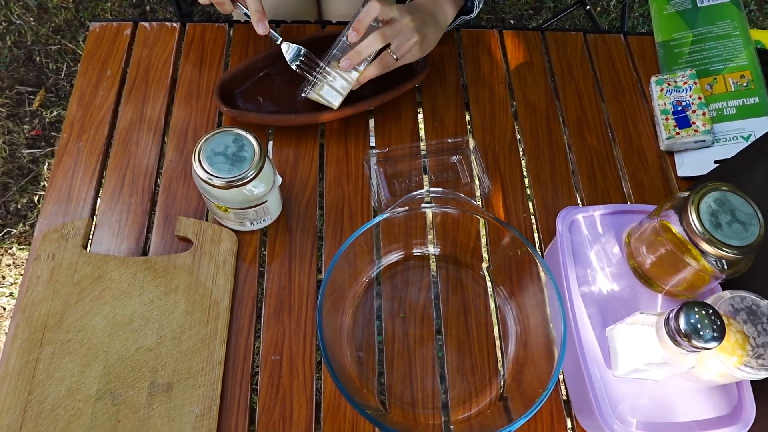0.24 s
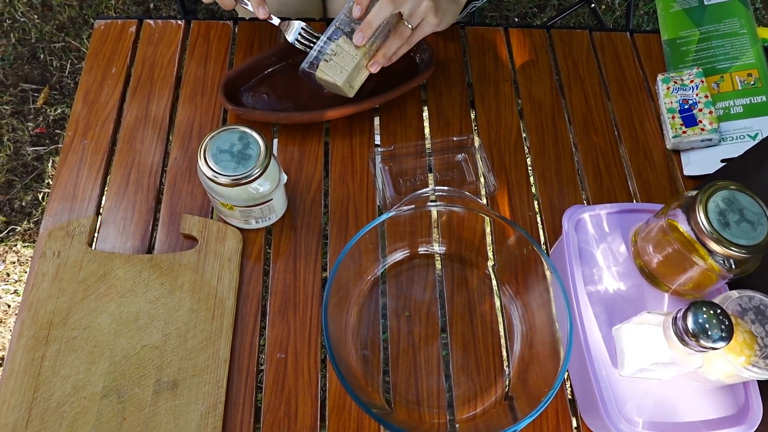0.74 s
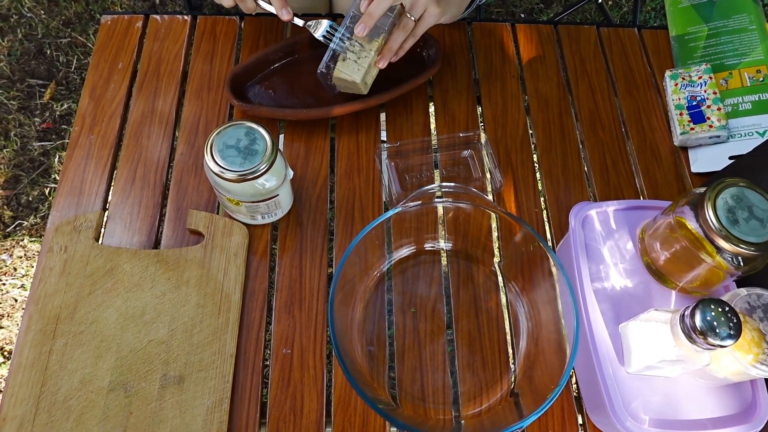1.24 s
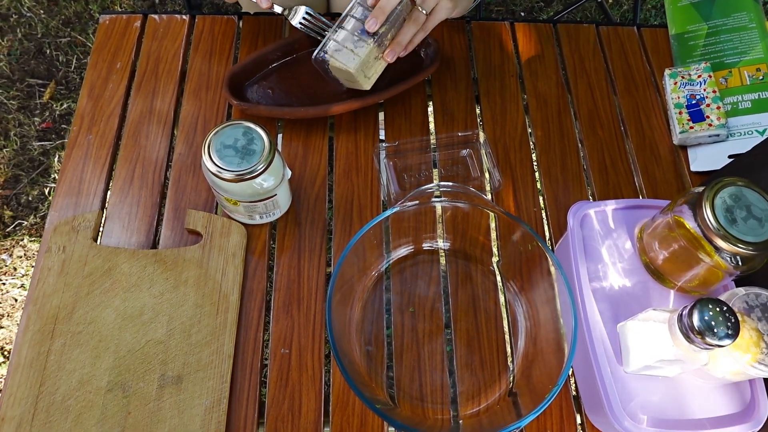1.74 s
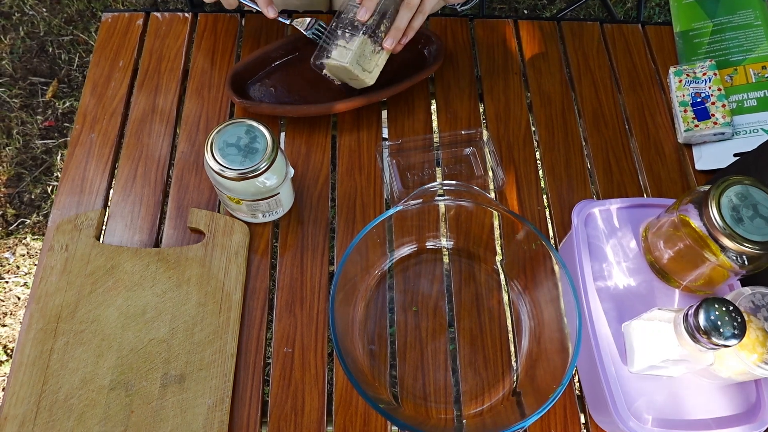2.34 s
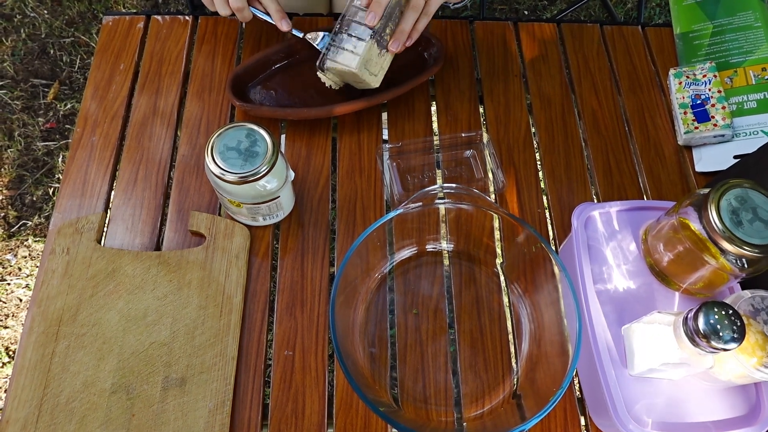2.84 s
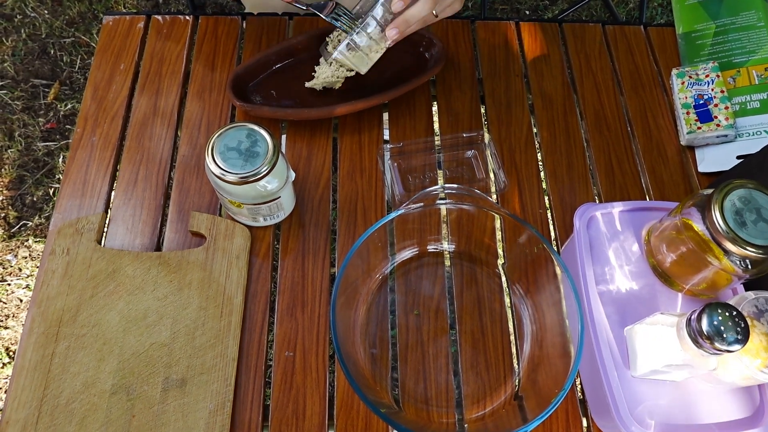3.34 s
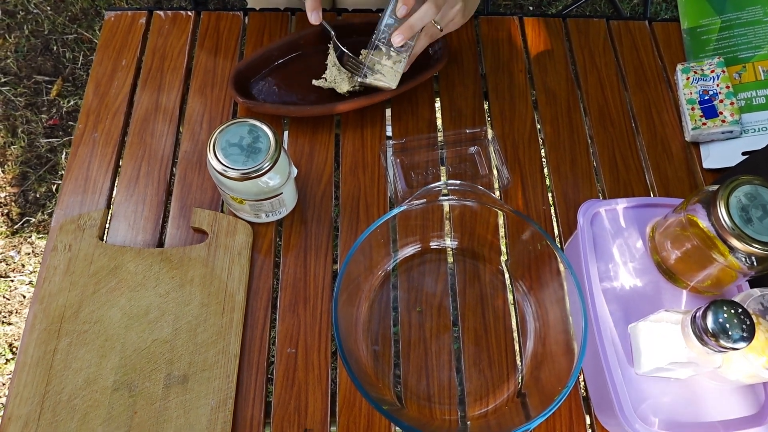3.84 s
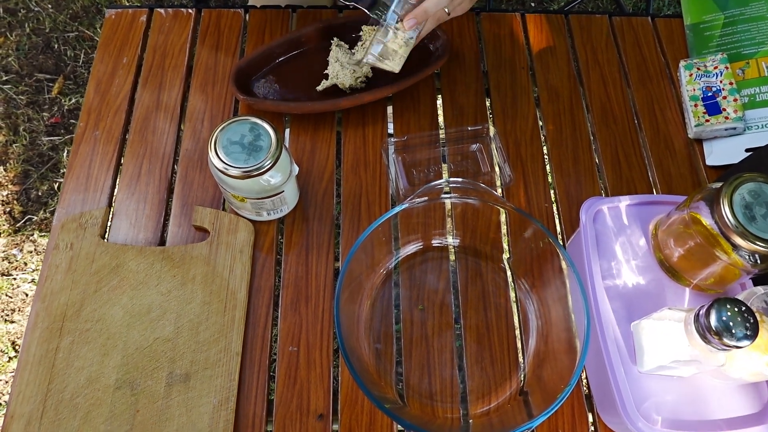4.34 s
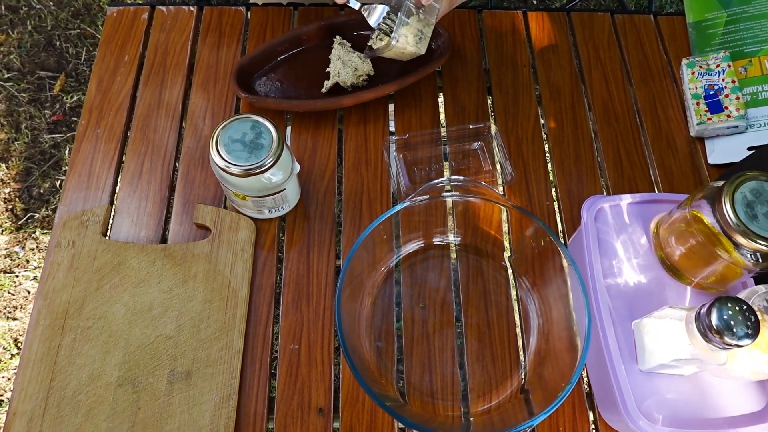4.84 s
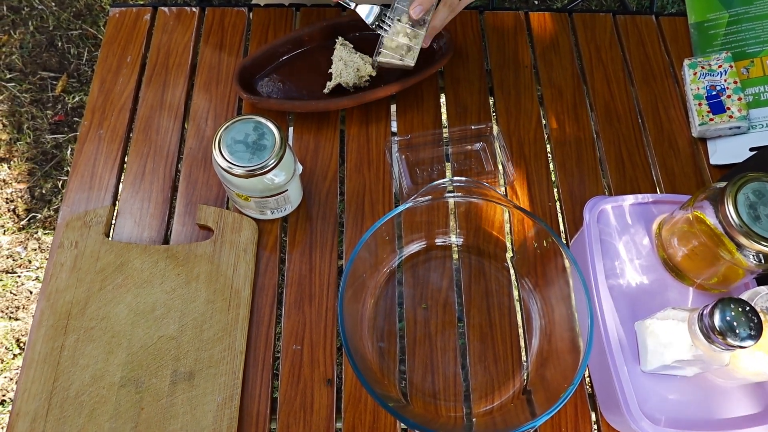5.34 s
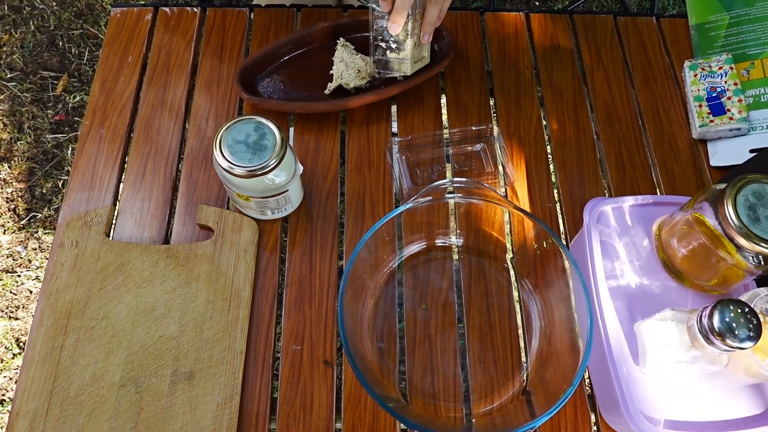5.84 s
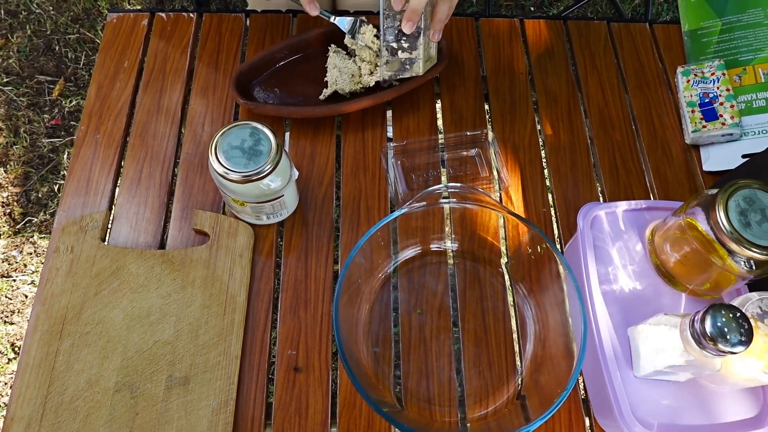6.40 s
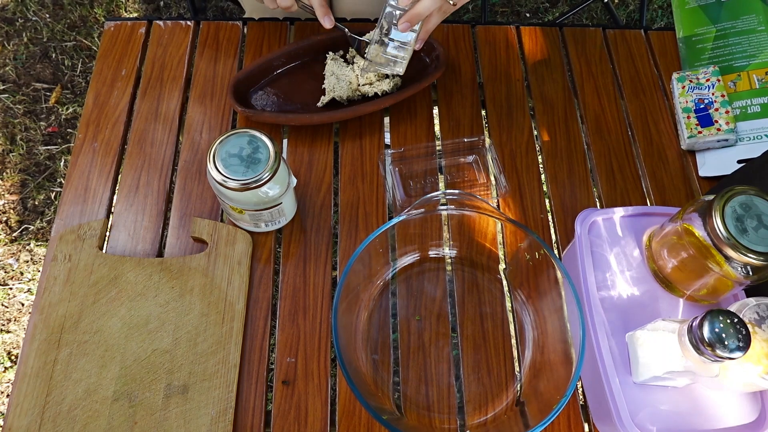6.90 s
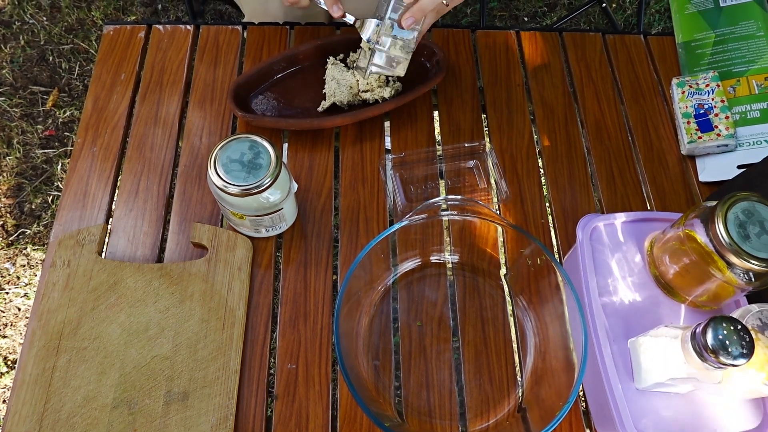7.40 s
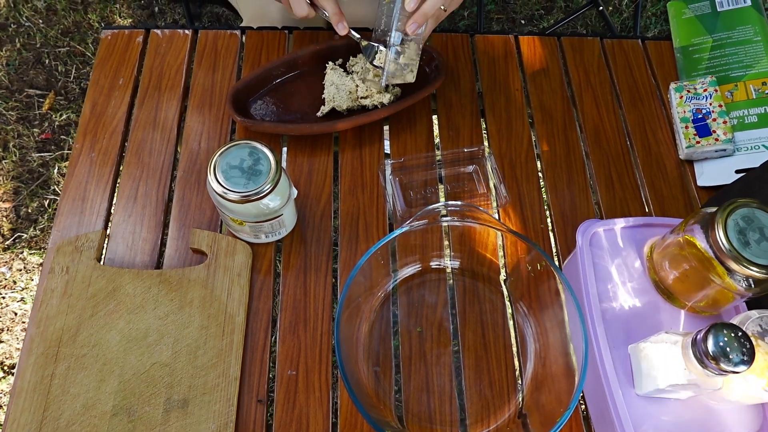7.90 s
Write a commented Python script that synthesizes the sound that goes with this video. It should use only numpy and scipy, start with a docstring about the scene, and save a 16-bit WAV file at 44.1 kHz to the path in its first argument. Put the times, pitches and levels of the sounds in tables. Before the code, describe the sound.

Dry plastic pops, light fork taps and small smearing rubs at a camp table, one harsh rasp, and low rumble slowly growing behind.

```python
"""A fork digs soft food out of a small thin plastic tub over a dish on an outdoor camp table.
The tub rings in short damped modes as its wall snaps in and out; between snaps, grains of slip rub and smear.
Once the tines skid with a harsh rasp; the fork clinks on the dish and dull bumps shake the table.
The tub sits in the centre with faint reflections. All round lie a nearly even hiss and a low rumble that
grows from midway, with light gusts on the microphone; a faint far whine is heard only at the start."""
import sys
import numpy as np
from scipy import signal
from scipy.fft import rfft, irfft, next_fast_len
from scipy.io import wavfile

SR = 44100
rng = np.random.default_rng(int(sys.argv[2]) if len(sys.argv) > 2 else 0)


def transcribe(signal):
    """Save signal, clipped to [-1, 1], as a 16-bit WAV file at the path in sys.argv[1]."""
    frames = np.atleast_2d(signal).T
    limited = np.clip(frames, -1, 1)
    pcm = np.round(limited * 32767).astype(np.int16)
    wavfile.write(sys.argv[1], SR, pcm)


N = 359856
TIME = np.arange(N) / SR

# Hiss of the open air. Each row: frequency in Hz, relative level in dB per Hz.
AIR_COLOUR = [(240, -31), (400, -9), (811, -6), (945, -6.5), (1090, -8), (1210, -5), (1860, -9),
              (2410, -7.5), (5530, -9), (15700, -23)]
# Level of the hiss over time. Each row: time in seconds, level in dB.
AIR_LEVEL = [(0, -51.5), (1.7, -53.5), (3.3, -54), (4.2, -52.5), (8.16, -50)]
# Low outdoor rumble. Each row: frequency in Hz, relative level in dB per Hz.
RUMBLE_COLOUR = [(25, -42), (50, -20), (85, -8), (150, -1.5), (280, -0.5), (400, -7), (600, -13.5),
                 (850, -35)]
# Steady at first, then growing.
RUMBLE_DB, RUMBLE_GROWS_FROM_S, RUMBLE_DB_PER_S = -61.5, 3.96, 1.4
# Gusts on the microphone. Each row: peak in seconds, level in dB, seconds to rise or fall by a factor e.
GUSTS = [(5.85, -70, 0.17), (8.17, -55.5, 0.085)]
# Buffeting at the microphone. Each row: frequency in Hz, relative level in dB per Hz.
BUFFET_COLOUR = [(15, -45), (30, -22), (60, 2), (110, -4), (200, -13), (400, -47)]
GUST_RUMBLE_DB = 12   # rumble that a gust stirs up, against its buffeting
# Stereo width of the background. Each row: frequency in Hz, left-right correlation from 0 to 1.
STEREO_LIKENESS = [(30, 0.54), (150, 0.77), (1000, 0.76), (6000, 0.74)]

# The far whine comes and goes. Each row: start in seconds, end in seconds, level in dB.
WHINES = [(-.04, 0.108, -56), (0.105, 0.404, -55.5), (0.497, .72, -61)]
WHINE_HZ, WHINE_FADE_S = 953, 0.03   # mean pitch of its strongest partial; fade at each end

# Rubbing strokes. Each row: start in seconds, end in seconds, level in dB, food under the tines from 0 to 1.
STROKES = [(0.135, 0.202, -61, 0.01), (0.334, 0.391, -49.5, 0.15), (1.235, 1.356, -61, 0.3),
           (1.29, 1.68, -65.5, 0.64), (2.134, 2.255, -60.5, 0), (2.244, 2.528, -62, 0.83),
           (2.76, 2.935, -60.5, 1), (3.537, 3.743, -63, 0.7), (3.776, 3.903, -58.5, 0.57),
           (4.057, 4.177, -57.5, 0.88), (4.562, 4.614, -53, 0.65), (4.782, 4.83, -55, 1),
           (5.486, 5.707, -63.5, 0.5), (5.787, 5.868, -51.5, 0.56), (6.22, 6.322, -53, 0.78),
           (6.9, 6.964, -50.5, 0.5), (7.098, 7.18, -54, 0.44), (7.393, 7.427, -52.5, 0.33),
           (7.508, 7.548, -59, 0.06), (7.636, 7.663, -49.5, 0.4), (7.705, 7.814, -56, 0.6),
           (7.902, 8.03, -54.5, 0.58), (8.077, 8.148, -58, 0.4)]
# Colour of the tub body under a stroke. Each row: frequency in Hz, relative level in dB per Hz.
BODY_COLOUR = [(25, -45), (150, -22), (450, -10), (900, -5.5), (1500, -1), (2300, -3.5), (3200, -0.5),
               (6000, -53)]
# Colour of dry friction. Each row: frequency in Hz, relative level in dB per Hz.
FRICTION_COLOUR = [(1200, -6.5), (2200, -1), (3300, 2.5), (4600, 1.5), (6800, -10), (9000, -24),
                   (16000, -47)]
# Colour of wet smear. Each row: frequency in Hz, relative level in dB per Hz.
SMEAR_COLOUR = [(4000, -32), (6500, 3), (8000, -0.5), (11000, -1.5), (16000, -8.5)]
# Balance of body, friction and smear in dB: on bare plastic, and deep in the food.
BARE_DB, COATED_DB = (9, 2.5, -8.5), (-5.5, 3.5, 4.5)
# Fork and tub under sliding tines. Each row: mode in Hz, relative level in dB, 60 dB decay in seconds.
SLIDING_MODES = [(853, 1, 0.03), (1200, 3, 0.035), (2140, 5.5, 0.03), (2520, -2, 0.017), (3680, -9, .012),
                 (5530, -19, .02), (7300, -16, .016), (8050, -17, 0.015)]

# The tub, one list each for wall, bottom, rim, crack and tick.
# Each row: mode in Hz, level within its list in dB, 60 dB decay in seconds.
TUB_MODES = [
    [(1259, -9, 0.02), (1420, -0.5, .011), (1564, 2.5, 0.01)],
    [(872, -3.5, 0.024), (1095, 17, 0.0092)],
    [(1810, 12, 0.0073), (2105, 13, 0.0058), (2570, -6.5, 0.026)],
    [(3430, 3.5, 0.014), (4120, 9.5, 0.0057), (4520, 6, 0.0055), (5795, 0.5, 0.0093), (6970, -6, 0.0071)],
    [(7800, 8.5, 0.0034), (9930, 0.5, 0.0084), (10750, 2, 0.0056), (14000, 2, .004)],
]
# Snaps as the wall is pushed in, and faint, hollow dull pats on the tub. Each row: time in seconds,
# wall level in dB rms over 10 ms, brightness in dB, hollow ring of the bottom in dB against the wall.
SNAPS_AND_PATS = [(0.3076, -24, -11, -11), (0.963, -24, -3.5, -10), (1.0267, -41.5, 2.5, 4),
                  (1.185, -55, -6, 11.5), (1.243, -36, -2.5, 0.5), (2.0913, -51, -5, 4),
                  (2.8583, -46, -9, 4.5), (2.959, -50.5, -6, 12), (3.7741, -25.5, 1, -12),
                  (4.0237, -24, 1.5, -12), (4.4009, -22.5, -13, -6.5), (4.4077, -30.5, -12, -5),
                  (4.5621, -25, -1, -7.5), (4.8173, -23, -7.5, -5.5), (4.9475, -40.5, -20, -5.5),
                  (6.869, -35.5, -18, 5), (6.8954, -30.5, -15, -4), (6.9088, -23.5, -12, -1.5),
                  (7.2649, -38, -22, -3), (7.301, -24, -16.5, -6), (7.4895, -20.5, -14, -6),
                  (7.6954, -18, -12, -9.5)]
# The wall springs back as the fork eases off. Each row: time in seconds, wall level in dB rms over 10 ms,
# brightness in dB.
REBOUNDS = [(4.4452, -20, -22), (4.864, -23, -12.5), (7.0452, -21, -20), (7.3495, -21, -19),
            (7.6046, -21, -10.5), (7.8291, -22.5, -12), (8.0554, -25.5, -14.5)]
# The tines tap the tub without a snap. Each row: time in seconds, wall level in dB rms over 10 ms,
# brightness in dB.
TAPS = [(0.2425, -44.5, 5.5), (0.2923, -43, 1), (1.2656, -48.5, 11.5), (1.871, -48.5, 10.5),
        (2.0259, -52, -4), (2.1596, -42.5, -9), (2.206, -41, 0.5), (4.1256, -52, 8.5), (5.5496, -44, -3),
        (5.7825, -45, 13.5), (5.8303, -55, 15), (6.3223, -45, 9), (7.3741, -41, 1), (7.8175, -47, 8.5),
        (8.0137, -43.5, -15)]
REBOUND_HOLLOW_DB, TAP_HOLLOW_DB = -30, 0   # ring of the bottom: a rebound hardly stirs it, a tap does
REBOUND_RIM_DB = -3   # a rebound also spares the rim
# A harder contact feeds rim, crack and tick, in that order.
# Each row: level in dB against the wall, dB gained per dB of brightness.
HARDNESS = [(1, .5), (0.5, 1), (-15.5, 1.8)]
LOWEST_HZ = 772   # lower edge of the ring of tub and dish
THUD_DB, THUD_TOP_HZ = -30.5, 430   # dull thud against the ringing shell, and its upper edge

# Dull bumps on dish and table. Each row: time in seconds, level in dB, 60 dB decay in seconds, boom in Hz.
BUMPS = [(2.195, -45.5, 0.16, 203), (2.751, -37, 0.034, 405), (3.836, -43.5, 0.1, 249),
         (3.858, -43.5, 0.23, 159), (5.783, -35.5, 0.14, 325), (5.808, -40, 0.19, 304),
         (5.829, -43.5, 0.27, 166), (8.090, -38.5, 0.14, 263)]
# Rattle of the table. Each row: frequency in Hz, relative level in dB per Hz.
BUMP_COLOUR = [(20, -45), (50, -22), (120, 2.5), (500, 0), (900, 5), (1250, 0), (2500, -35)]

CLINK_S, CLINK_DB = 2.7524, -24.5   # one knock on the dish: time, dB rms over 10 ms before its high-pass
# The dish. Each row: mode in Hz, relative level in dB, 60 dB decay in seconds.
DISH_MODES = [(1210, -4, 0.017), (2600, -3, 0.018), (3160, -3.5, 0.01), (3880, 6.5, 0.0048),
              (5560, -8.5, 0.0078), (9700, -1, 0.0021)]

# The hard skid: the tines catch and let go while the pressure builds.
SKID_START_S, SKID_HOLD_S, SKID_ATTACK_S, SKID_T60_S = 6.339, 0.034, .0015, 0.021
SKID_DB, SKID_SWELL_DB_PER_S = -22, 124
JUDDER_S, JUDDER_SAG_DB = 0.012, 7   # time between catches, and the level lost within each
# Grit of the skid. Each row: frequency in Hz, relative level in dB per Hz.
SKID_GRIT = [(100, -55), (600, -33), (1000, -22), (3000, 6), (7000, 4), (16000, -2.5)]

CUTOFF_HZ = 16000


def from_db(db):
    """Decibels to gain."""
    return 10 ** (np.asarray(db) / 20)


def rms_one(x):
    """Scale to rms 1."""
    return x / np.sqrt(np.mean(x ** 2) + 1e-20)


def at_hz(points, hz):
    """Read a spectrum on a log-frequency axis."""
    f, value = np.transpose(points)
    return np.interp(np.log(hz + 1e-6), np.log(f), value)


def cut(x, hz, kind, order=2):
    """Butterworth low- or high-pass."""
    return signal.sosfilt(signal.butter(order, hz, kind, fs=SR, output="sos"), x)


def coloured(x, spectrum):
    """Give a noise or grain stream a spectrum; rms 1."""
    size = next_fast_len(N)
    hz = np.arange(size // 2 + 1) * SR / size
    gain = from_db(at_hz(spectrum, hz))
    return rms_one(irfft(rfft(x, size) * gain, size)[:N])


def drift(per_s):
    """Random wandering: straight lines between normal draws, per_s of them each second."""
    knots = rng.standard_normal(N // 20)
    return np.interp(TIME * per_s, np.arange(len(knots)), knots)


def grains(per_s, spread_db):
    """Tiny slips at random moments, of very uneven size; rms 1."""
    sizes = from_db(spread_db * np.minimum(rng.exponential(1, N), 4))
    signs = rng.choice([-1, 1], N)
    happens = rng.random(N) < per_s / SR
    return rms_one(sizes * signs * happens)


def ring(x, hz, t60):
    """One damped mode driven by x, as a two-pole resonator."""
    r = from_db(-60 / (t60 * SR))
    w = 2 * np.pi * hz / SR
    return signal.lfilter([0, np.sin(w)], [1, -2 * r * np.cos(w), r * r], x + 1e-18)


def add(track, s, sound):
    """Mix a sound into a track at s seconds."""
    i = round(s * SR)
    track[i:i + len(sound)] += sound[:N - i]


def wide_noise(spectrum):
    """Stereo noise, partly alike in both channels; rms 1."""
    size = next_fast_len(N)
    hz = np.arange(size // 2 + 1) * SR / size
    alike = at_hz(STEREO_LIKENESS, hz)
    mid, side = rfft(rng.standard_normal((2, size)))
    both = np.sqrt(1 + alike) * mid + np.sqrt(1 - alike) * side * [[1], [-1]]
    return rms_one(irfft(both * from_db(at_hz(spectrum, hz)), size)[:, :N])


def background():
    """Nearly even hiss, a growing outdoor rumble and light gusts on the microphone, all shaped noise."""
    air_s, air_db = np.transpose(AIR_LEVEL)
    air = from_db(np.interp(TIME, air_s, air_db)) * cut(wide_noise(AIR_COLOUR), 370, "high")
    gust = sum(from_db(db) * np.exp(-np.abs(TIME - s) / width_s) for s, db, width_s in GUSTS)
    steady = from_db(RUMBLE_DB + RUMBLE_DB_PER_S * np.maximum(TIME - RUMBLE_GROWS_FROM_S, 0))
    stirred = from_db(GUST_RUMBLE_DB) * gust
    rumble = np.hypot(steady, stirred) * wide_noise(RUMBLE_COLOUR)
    buffeting = gust * from_db(2 * drift(12)) * wide_noise(BUFFET_COLOUR)
    return air + rumble + buffeting


def whine(waver=0.0175, upper_db=-10.0, flutter_db=5.0, flutters_per_s=40):
    """Second and third partials of a far, unsteady tone that flutters on its way."""
    phase = 2 * np.pi * np.cumsum(WHINE_HZ * (1 + waver * drift(142.7))) / SR
    tone = np.sin(phase) + from_db(upper_db) * np.sin(3 * phase / 2)
    level = np.zeros(N)
    for start, end, db in WHINES:
        fade = np.clip(np.minimum(TIME - start, end - TIME) / WHINE_FADE_S, 0, 1)
        level += from_db(db) * fade
    return np.sqrt(2) * tone * level * from_db(flutter_db * drift(flutters_per_s))


def arches(column):
    """Drive of body (0), friction (1) or smear (2): strokes swell and fade as bells; food trades body for smear."""
    pressure = np.zeros(N)
    for start, end, db, food in STROKES:
        offset = (TIME - (start + end) / 2) / (end - start)
        level_db = db + (1 - food) * BARE_DB[column] + food * COATED_DB[column]
        bell = np.sqrt(2) * np.exp(-2 * np.pi * np.minimum(offset ** 2, 10))
        pressure += from_db(level_db) * bell
    return pressure


def dragged(slips):
    """The lasting ring of fork and tub under sliding contact; rms 1."""
    rings = np.zeros(N)
    for k, (hz, db, t60) in enumerate(SLIDING_MODES):
        rings += (-1) ** k * from_db(db) * ring(slips, hz, t60)
    return rms_one(cut(rings, 650, "high"))


def rubbing(slips_per_s=(1500, 3500, 7000), spread_db=5.0, jerk_db=4.5, jerks_per_s=190, ring_db=-18.0):
    """The tines catch and slip; all three colours jerk together and set fork and tub ringing."""
    jerk = from_db(jerk_db * drift(jerks_per_s))
    rub = np.zeros(N)
    for k, colour in enumerate((BODY_COLOUR, FRICTION_COLOUR, SMEAR_COLOUR)):
        slips = jerk * grains(slips_per_s[k], spread_db)
        rub += arches(k) * coloured(slips, colour)
    return rub + from_db(ring_db) * np.std(rub) * dragged(rub)


def creaks(catches_per_s=115, unevenness=.45, spread_db=5.0, over_body_db=-1.0):
    """Under a stroke the tines catch and let go in an uneven train of tiny ticks, each ringing the tub."""
    rate = catches_per_s * np.exp(unevenness * drift(catches_per_s))
    catches = np.floor(np.cumsum(rate) / SR)
    sizes = from_db(spread_db * np.clip(rng.standard_normal(N), -2, 2))
    clicks = np.diff(catches, prepend=0) * sizes
    rings = np.zeros(N)
    for part in TUB_MODES[:-1]:   # all but the tick
        for hz, db, t60 in part:
            rings += from_db(db) * ring(clicks * rng.standard_normal(N), hz, t60)
    return from_db(over_body_db) * arches(0) * rms_one(cut(rings, 1020, "high"))


def snap(db, bright_db, hollow_db, rim_db=0, rise_cycles=1.0, soft_rise=0.051, contact_s=0.00034,
         detune=0.045, vary_db=6.0):
    """One contact rings the tub for a few ms; its modes vary a little at random in pitch and strength."""
    out, t = 0, np.arange(SR // 20) / SR
    wall_hz = TUB_MODES[0][1][0]   # the wall's main mode
    rim, crack, tick = [base_db + slope * bright_db for base_db, slope in HARDNESS]
    softness = max(-rim - rim_db, 0)   # a dull snap has little rim in it and swells more slowly
    for modes, rel_db in zip(TUB_MODES, [0, hollow_db, rim + rim_db, crack, tick]):
        hz, level_db, t60 = np.transpose(modes)[:, :, None]
        shift, strength = rng.standard_normal((2, len(modes), 1))
        hz = hz * (1 + detune * shift * np.sqrt(hz / wall_hz))   # high modes move most
        rise_s = np.maximum((rise_cycles + soft_rise * softness) / hz, contact_s)
        decay = from_db(level_db + vary_db * strength - 60 * t / t60)
        envelope = (1 - np.exp(-t / rise_s)) * decay
        part = (envelope * np.sin(2 * np.pi * hz * t)).sum(0)
        rms_10ms = np.sqrt(np.sum(part ** 2) / (.01 * SR))
        out = out + from_db(db + rel_db) * part / rms_10ms
    return out


def snaps():
    """The wall snaps in, springs back, or is patted and tapped: all ring the same tub."""
    out = np.zeros(N)
    for s, db, bright_db, hollow_db in SNAPS_AND_PATS:
        add(out, s, snap(db, bright_db, hollow_db))
    for s, db, bright_db in REBOUNDS:
        add(out, s, snap(db, bright_db, REBOUND_HOLLOW_DB, REBOUND_RIM_DB))
    for s, db, bright_db in TAPS:
        add(out, s, snap(db, bright_db, TAP_HOLLOW_DB))
    # so small a shell radiates little below its lowest mode
    shell = signal.sosfilt(signal.ellip(4, 1, 32, LOWEST_HZ, "high", fs=SR, output="sos"), out)
    # the dull low thud under a snap, from the tub resting on the dish
    thud = cut(cut(out, THUD_TOP_HZ, "low", order=4), THUD_TOP_HZ / 2, "high")
    return shell + from_db(THUD_DB) * np.std(shell) * rms_one(thud)


def bumps(boom_t60=0.039):
    """Soft blows shake the slatted table: half a rattle of crowded modes, half the boom of the spot hit."""
    out, t = np.zeros(N), np.arange(SR // 3) / SR
    rattle = coloured(rng.standard_normal(N), BUMP_COLOUR)
    for k, (s, db, t60, hz) in enumerate(BUMPS):
        # keep the second half, where the resonance has settled
        boom = rms_one(ring(rng.standard_normal(2 * len(t)), hz, boom_t60)[len(t):])
        shake = (boom + rattle[k * len(t):(k + 1) * len(t)]) / np.sqrt(2)
        attack = np.minimum(t / .001, 1)
        add(out, s, shake * from_db(db - 60 * t / t60) * attack)
    return cut(out, 88, "high", order=4)


def clink(contact_s=0.0002):
    """The fork knocks on the dish, whose ring the food damps at once."""
    out, t = np.zeros(N), np.arange(SR // 20) / SR
    modes = sum(from_db(db - 60 * t / t60) * np.sin(2 * np.pi * hz * t) for hz, db, t60 in DISH_MODES)
    knock = modes * (1 - np.exp(-t / contact_s))
    rms_10ms = np.sqrt(np.sum(knock ** 2) / (.01 * SR))
    add(out, CLINK_S, from_db(CLINK_DB) * knock / rms_10ms)
    return cut(out, LOWEST_HZ, "high")


def skid(slips_per_s=6000, spread_db=6.0, grit_db=-3.0):
    """Pressed hard, the tines judder along: dense slips, with tub and fork ringing under them."""
    t = np.maximum(TIME - SKID_START_S, 0)
    held = np.minimum(t, SKID_HOLD_S)
    attack = np.minimum(t / SKID_ATTACK_S, 1)
    release = from_db(-60 * np.minimum((t - held) / SKID_T60_S, 3))
    sag_db = JUDDER_SAG_DB * (held / JUDDER_S % 1)
    force = attack * release * from_db(SKID_DB + SKID_SWELL_DB_PER_S * held - sag_db)
    slips = grains(slips_per_s, spread_db)
    rings = dragged(force * slips) / np.sqrt(2)   # half the power is in the ring
    grit = rms_one(force * coloured(slips, SKID_GRIT))
    return np.sqrt(np.mean(force ** 2)) * (rings + from_db(grit_db) * grit)


def camp_table(x, bounce_s=0.002105, bounce_db=-14.0, scatter_db=-16.5, scatter_t60=0.021,
               far_db=-25.5, far_t60=0.4):
    """One bounce off the table, a scatter from the jars and bowls, a very faint outdoor tail."""
    t = np.arange(SR // 4) / SR
    decays = from_db(-60 * t / np.array([scatter_t60, far_t60])[:, None, None])
    tails = rng.standard_normal((2, 2, len(t))) * decays * (t > .001)   # (near or far, channel, time)
    near, far = tails / np.sqrt(np.sum(tails ** 2, axis=-1, keepdims=True))
    near = 2 * cut(near, 2300, "high", order=1)   # small things scatter mostly treble
    response = from_db(scatter_db) * near + from_db(far_db) * far
    echoes = signal.fftconvolve(x[None], response, axes=-1)[:, :N]
    bounce = from_db(bounce_db) * np.interp(TIME - bounce_s, TIME, x)
    return x + bounce + echoes


def scene():
    """Fork, tub and table in the centre, the far whine behind, the outdoors all round."""
    at_table = rubbing() + creaks() + snaps() + bumps() + clink() + skid()
    return camp_table(at_table) + whine() + background()


def record(dry):
    """A steep low-pass cuts the top of the treble."""
    return signal.sosfilt(signal.ellip(12, .1, 70, CUTOFF_HZ, fs=SR, output="sos"), dry)


dry = scene()
out = record(dry)
transcribe(out)
```